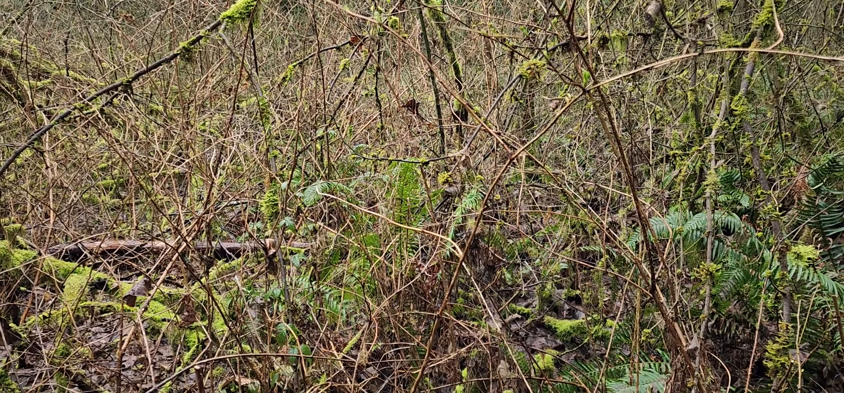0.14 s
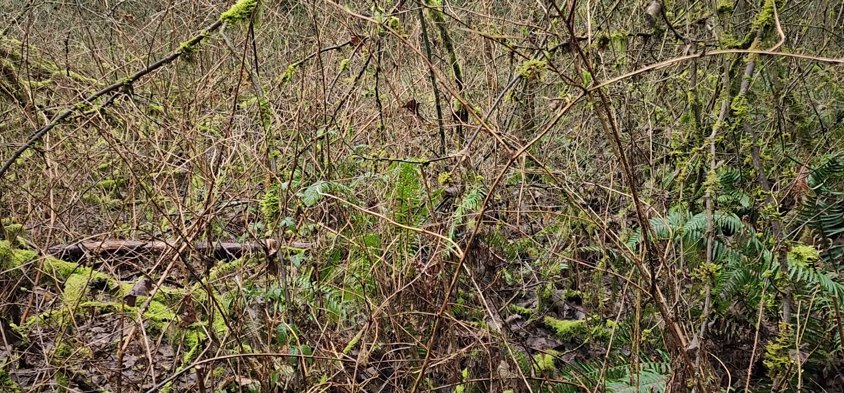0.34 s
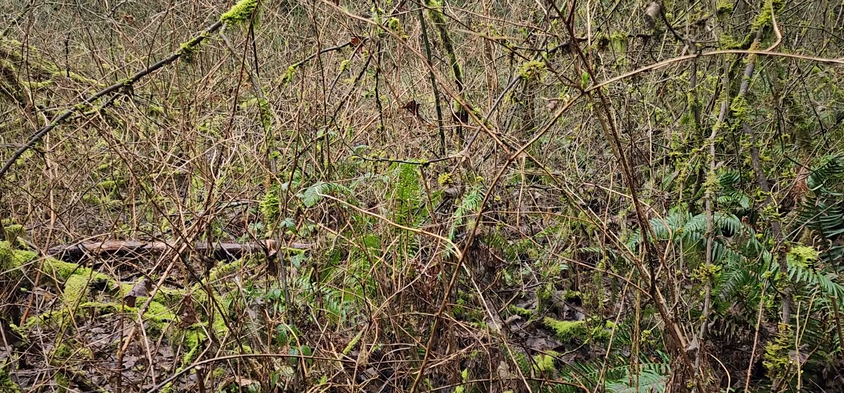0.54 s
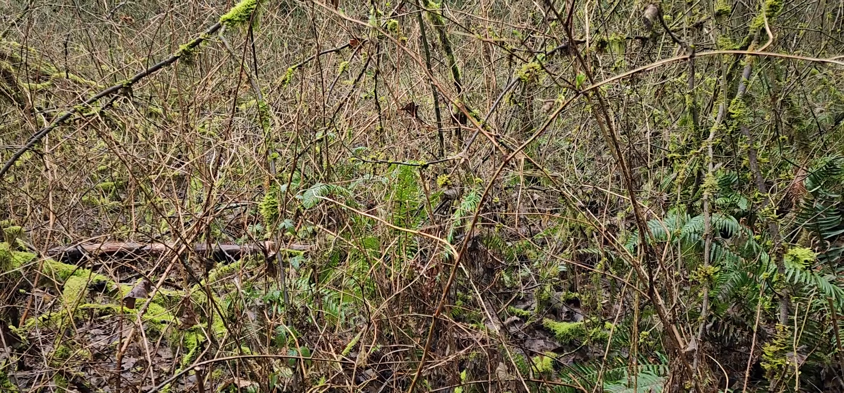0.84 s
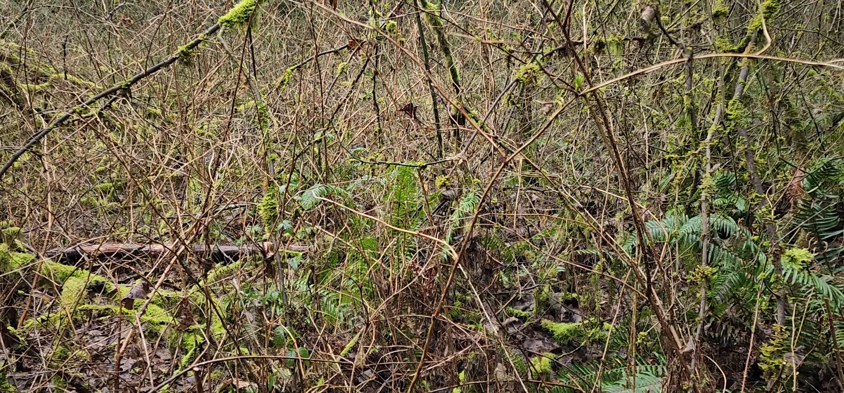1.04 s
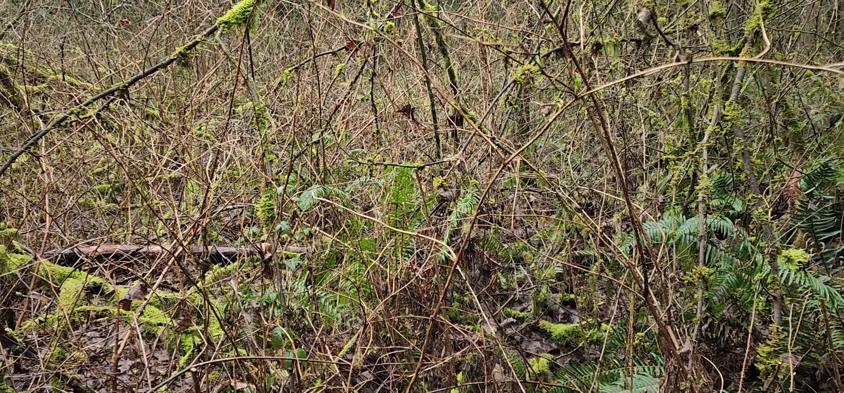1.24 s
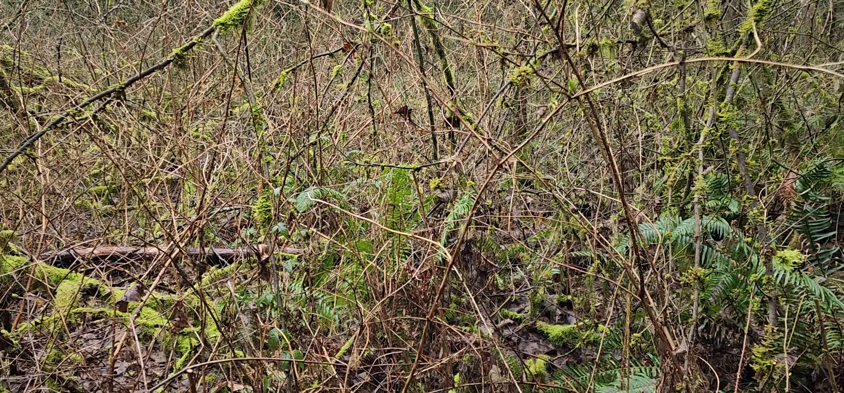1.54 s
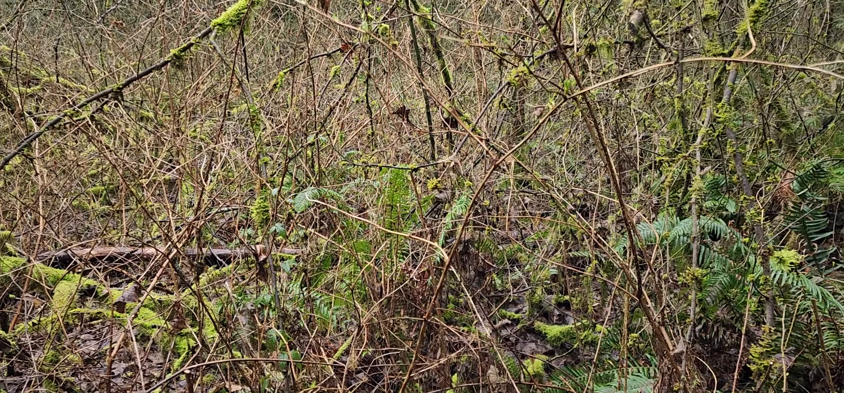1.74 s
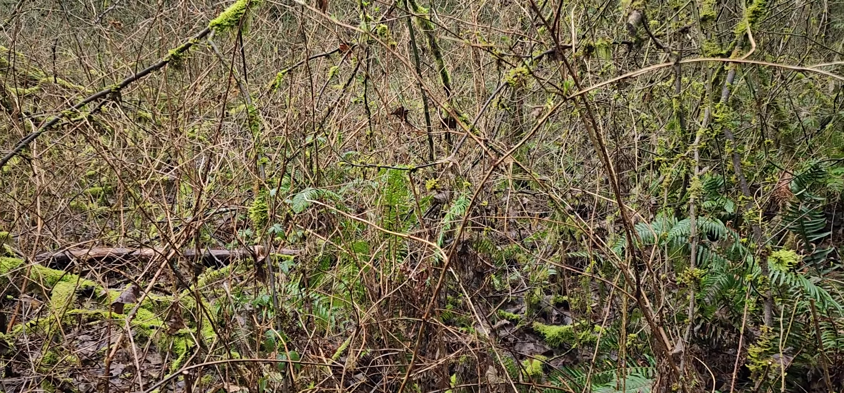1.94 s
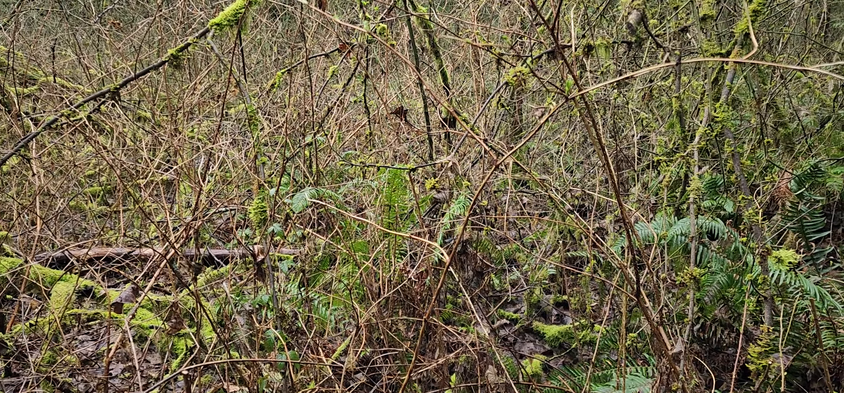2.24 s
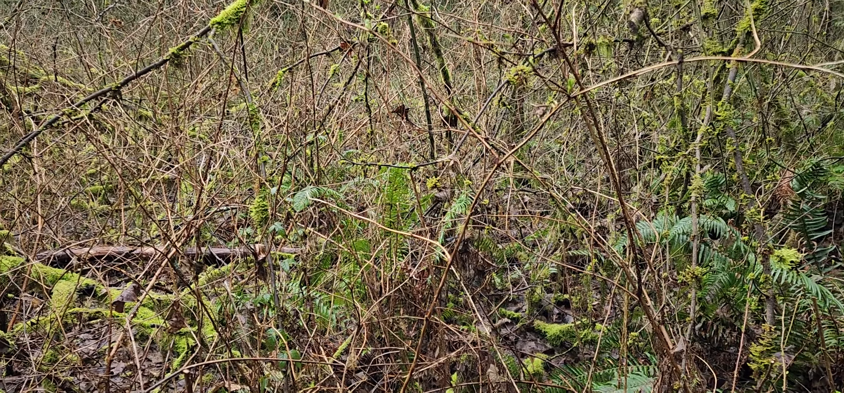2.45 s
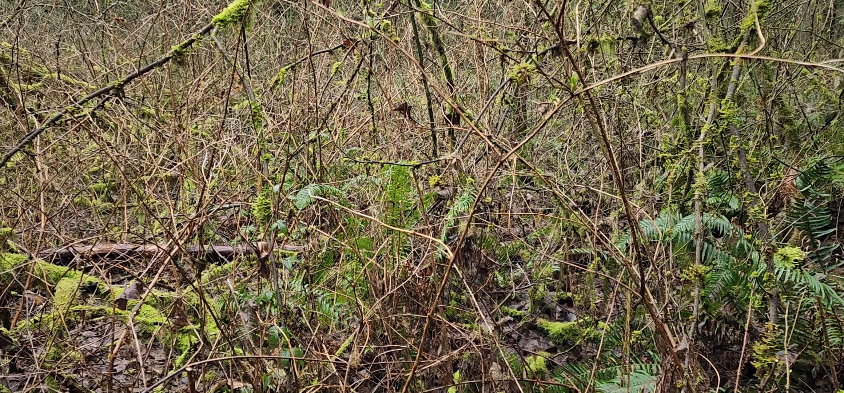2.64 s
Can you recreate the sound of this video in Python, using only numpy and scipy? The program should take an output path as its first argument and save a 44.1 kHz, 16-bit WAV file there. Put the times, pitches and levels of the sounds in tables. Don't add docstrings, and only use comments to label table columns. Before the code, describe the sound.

Two small frogs rasp in a wet thicket. A faint high bird whistle falls at 0.0-0.2 s; light drips tick from 0.5. The first frog creaks unevenly from 0.83 to 1.5, rising and thinning, with faint bird chirps near 0.85 and a dull low drop at 0.97. Then only soft traffic rumble and hiss. At 2.23-2.7 the second frog rasps evenly, rising, ending squeaky with drips.

```python
import sys
import numpy as np
from scipy import signal
from scipy.fft import rfft, irfft, next_fast_len
from scipy.io import wavfile
from scipy.ndimage import uniform_filter1d

SR = 44100
rng = np.random.default_rng(int(sys.argv[2]) if len(sys.argv) > 2 else 0)


def generate_wav(sig):
    pcm = np.round(np.clip(np.atleast_2d(sig).T, -1, 1) * 32767).astype(np.int16)
    wavfile.write(sys.argv[1], SR, pcm)


def how_loud(loudness_db):
    steps = np.asarray(loudness_db, float) / 20
    return 10 ** steps


N = 123921


def along(table, hz):
    table_hz, value = np.array(table, float).T
    return np.interp(np.log(hz + 1), np.log(table_hz + 1), value)


def walk(rate_per_s):
    hold = int(SR / rate_per_s)
    steps = np.repeat(rng.standard_normal(N // hold + 1), hold)
    return 1.3 * uniform_filter1d(uniform_filter1d(steps, hold), hold)[:N]


def pan(left_minus_right_db):
    return how_loud(np.array([[left_minus_right_db], [-left_minus_right_db]]) / 2)


def add(out, start_s, sound):
    i = int(start_s * SR)
    out[..., i:i + sound.shape[-1]] += sound[..., :N - i]


def swell(rise_s, fall_s, hold_s=0):
    t = np.arange(4096) / SR
    after = np.maximum(t - rise_s - hold_s, 0)
    rise = np.sin(np.pi / 2 * np.minimum(t / rise_s, 1)) ** 2
    return t, rise * np.exp(-after ** 2 / (fall_s * (after + fall_s)))


def noise_band(noise, hz, width_hz):
    f = np.arange(2049) * SR / 4096
    return irfft(rfft(noise) * np.exp(-((f - hz) / width_hz) ** 2))


def grainy(hz, width_hz):
    x = noise_band(rng.standard_normal(4096), hz, width_hz)
    return x / np.std(x) / np.sqrt(2)


ECHO_T60_S, ECHO_GAP_S, ECHO_TAPS_DB = .38, .0032, 4


def thicket(x, wet_db):
    t = np.arange(SR // 2) / SR
    taps_db = ECHO_TAPS_DB * rng.exponential(size=(2, len(t)))
    h = rng.standard_normal((2, len(t))) * how_loud(taps_db - 60 * t / ECHO_T60_S)
    h = h * np.clip(t / ECHO_GAP_S - 1, 0, 1)
    h = h / np.sqrt(np.sum(h ** 2, axis=1, keepdims=True))
    return how_loud(wet_db) * signal.fftconvolve(x[None], h, axes=1)[:, :N]


# hz, density_db (dB per Hz)
RUMBLE = [(12, -32.5), (20, -9.5), (65, -4.5), (91, -0.5), (113, -4.5), (134, -10.5), (206, -9.5),
          (264, -12), (400, -19), (520, -57.5), (880, -120)]
HISS = [(240, -37.5), (400, -6.5), (554, -3), (687, -2.5), (835, -4.5), (1140, -11), (1490, -14),
        (1860, -17.5), (3710, -37.5), (4820, -74), (8160, -120)]
AIR = [(3600, 2), (4000, 1), (4750, -4.5), (5700, 3.5), (6800, -7.5), (7500, -2), (8600, -6.5), (9500, -33)]
TOP = [(8500, -23), (10000, -11), (11500, 0), (13000, -3), (15800, 4), (17000, -30)]
RUMBLE_DB, HISS_DB, AIR_DB, TOP_DB = -45, -51.5, -75, -99
# hz, correlation (-)
LIKENESS = [(30, 10), (60, 1), (150, 1.18), (330, .58), (590, 0.29), (1040, -0.7), (1840, 0.08),
            (3260, -0.02), (9000, -0.08)]
# hz, left_minus_right_db
LEAN = [(30, 1.2), (130, .4), (300, 1.1), (2000, 1.3), (4500, 4.4), (9000, 6.5), (13000, 8)]
# time_s, level_db
TRAFFIC = [(0, 1.5), (.4, 1), (0.799, -1), (1.2, 1), (1.5, 2.5), (1.9, -0.5), (2.301, -1), (2.8, -3.5)]
SWELL_TOP_HZ = 200
FLICKER_DB, AIR_FLICKER_DB, FLICKER_PER_S = 1.2, 1.7, 6


def background():
    size = next_fast_len(N)
    f = np.arange(size // 2 + 1) * SR / size
    power = 0
    for table, db in ((RUMBLE, RUMBLE_DB), (HISS, HISS_DB), (AIR, AIR_DB), (TOP, TOP_DB)):
        p = how_loud(along(table, f)) ** 2 * (f > 8)
        power = power + p / p.sum() * how_loud(db) ** 2

    likeness = np.clip(along(LIKENESS, f), -.98, .98)
    mid, side = rfft(rng.standard_normal((2, size))) * np.sqrt(power * size / 2)
    side = side * np.sqrt((1 - likeness) / (1 + likeness))
    both = np.array([mid + side, mid - side]) * pan(1) ** along(LEAN, f)

    traffic_db = np.interp(np.arange(N) / SR, *np.array(TRAFFIC).T)
    half_octave = 2 * np.log2(np.clip(f, 30, 15360) / 30)
    out = 0
    for k in range(19):
        band_hz = 30 * 2 ** (k / 2)
        band = irfft(both * np.clip(1 - np.abs(half_octave - k), 0, 1), size)[:, :N]
        swell_db = traffic_db / (1 + (band_hz / SWELL_TOP_HZ) ** 2)
        flicker_db = FLICKER_DB if k < 14 else AIR_FLICKER_DB
        out = out + band * how_loud(swell_db + flicker_db * walk(FLICKER_PER_S))
    return out


# start_s, length_s, from_hz, to_hz, level_db
BIRD = [
    (.03, .17, 7650, 7400, -78),
    (.828, .022, 7200, 7300, -79),
    (.845, .022, 7250, 7350, -80),
    (.868, .02, 7250, 7350, -84),
]


def bird():
    out = np.zeros(N)
    for start_s, length_s, from_hz, to_hz, db in BIRD:
        u = np.arange(int(length_s * SR)) / (length_s * SR)
        hz = from_hz + (to_hz - from_hz) * u + 60 * walk(150)[:len(u)]
        level = how_loud(db + 4 * walk(60)[:len(u)]) * np.sin(np.pi * u ** .5)
        add(out, start_s, level * np.sin(2 * np.pi * np.cumsum(hz) / SR))
    return out * pan(4) + thicket(out, -4)


# time_s, peak_db, centre_hz, left_minus_right_db
TICKS = [(.0533, -67, 12500, 12), (.5277, -77, 12000, 4), (.5866, -73, 12000, 8), (.6779, -63, 11900, 3),
         (.7487, -64, 12500, 7), (.7662, -66, 12500, 6), (.7776, -61, 12000, 5), (1.061, -68, 11500, 4),
         (1.2042, -62, 10500, 2), (2.604, -61, 12000, 8), (2.6893, -67, 12000, 8)]
TICK_WIDTH_HZ, TICK_FALL_S, TICK_TAIL_DB = 4000, .001, -21
# time_s, peak_db, centre_hz, left_minus_right_db
DROPS = [(.520, -73, 5300, 35), (0.522, -53.5, 3300, -3), (.587, -58.5, 7800, 6), (0.643, -65, 6000, -23),
         (.970, -41, 550, -17.5), (1.203, -48, 5500, 9), (1.21, -59, 8100, 2), (1.216, -62, 9200, 1),
         (1.212, -51, 3500, -2), (2.477, -64.5, 8100, 2), (2.604, -55.5, 5100, 19),
         (2.605, -58.5, 8300, 13), (2.69, -63, 8500, 10), (2.689, -58, 5950, -15)]
DROP_Q, DROP_FALL_S, DROP_TAIL_DB = 4.2, .0012, -26
TAIL_FALL_S = .025


def drops():
    out, t = np.zeros((2, N)), np.arange(4096) / SR
    rows = [row + (TICK_WIDTH_HZ, TICK_FALL_S, TICK_TAIL_DB) for row in TICKS]
    for row in DROPS:
        hz = row[2]
        rows.append(row + (hz / DROP_Q, max(DROP_FALL_S, 3 / hz), DROP_TAIL_DB))
    for time_s, db, hz, pan_db, width_hz, fall_s, tail_db in rows:
        env = np.exp(-t / fall_s) + how_loud(tail_db) * np.exp(-t / TAIL_FALL_S)
        left, right, shared = rng.standard_normal((3, 4096))
        noise = np.array([left + shared, right + shared]) * env
        burst = noise_band(np.roll(noise, 512, axis=1), hz, width_hz)
        burst = burst / np.max(np.abs(burst), axis=1, keepdims=True)
        add(out, time_s - 512 / SR, burst * how_loud(db) * pan(pan_db))
    return out


# start_s, pulses (count), period_s
RUNS_B = [
    (2.2313, 2, .0169),
    (2.2647, 18, .01848),
    (2.5974, 7, .01947),
]
# time_s, pitch_hz, peak_db, half_pitch_db, squeak_db
EFFORT_B = [
    (2.23, 2050, -54, -6, -9),
    (2.249, 2100, -46, -8, -14),
    (2.266, 2420, -43, 0, -20),
    (2.34, 2550, -41, -1, -24),
    (2.43, 2700, -41, 0, -24),
    (2.5, 2740, -43, 1, -22),
    (2.617, 2820, -45, 1, -14),
    (2.636, 2800, -50, 2, 6),
    (2.715, 2800, -56, 0, 3),
]
# pitch_multiple (-), level_db
SAC_B = [(.75, -9), (1.26, -9)]
SCATTER_DB, PITCH_JITTER = .8, .007
SQUEAK_HZ, RASP_HZ, RASP_WIDTH_HZ, RASP_DB = 3050, 2200, 900, -14
LEAD_B_RAD, PAN_B_DB, WET_B_DB = 1.1, 1.5, -5


def frog_b():
    dry = np.zeros(N)
    effort_s, *efforts = np.array(EFFORT_B, float).T
    t, env = swell(rise_s=.0012, fall_s=.0014, hold_s=.001)
    low_env = swell(rise_s=.0022, fall_s=.0022)[1]
    times_s = np.concatenate([start_s + period_s * np.arange(n) for start_s, n, period_s in RUNS_B])
    for s, chance in zip(times_s, rng.standard_normal((len(times_s), 5))):
        hz, db, low_db, squeak_db = (np.interp(s, effort_s, e) for e in efforts)
        phase = 2 * np.pi * hz * (1 + PITCH_JITTER * chance[0]) * t
        tone = np.sin(phase)
        for k, (multiple, partial_db) in enumerate(SAC_B):
            tone = tone + how_loud(partial_db + 2 * SCATTER_DB * chance[2 + k]) * np.sin(multiple * phase)
        tone = tone + how_loud(squeak_db) * np.sin(2 * np.pi * SQUEAK_HZ * t + chance[4])
        tone = tone + how_loud(RASP_DB) * grainy(RASP_HZ, RASP_WIDTH_HZ)
        low = how_loud(low_db) * low_env * np.sin(phase / 2)
        add(dry, s, how_loud(db + SCATTER_DB * chance[1]) * (env * tone + low))
    left = np.real(signal.hilbert(dry, next_fast_len(N))[:N] * np.exp(1j * LEAD_B_RAD))
    return np.array([left, dry]) * pan(PAN_B_DB) + thicket(dry, WET_B_DB)


# start_s, peak_db, pitch_hz
FROG_A = [(0.8285, -54, 2550), (0.848, -46, 2500), (0.8704, -42.5, 2500), (0.8905, -42.5, 2660),
          (0.9535, -40.5, 2667), (0.9722, -44.5, 2846), (0.9929, -43, 2740), (1.0146, -41, 2790),
          (1.0348, -48, 2905), (1.054, -42.5, 2715), (1.0783, -40.5, 3015), (1.0971, -44, 2994),
          (1.1132, -41.5, 2917), (1.1371, -41, 3082), (1.1773, -51, 2914), (1.296, -43.5, 2967),
          (1.3379, -44, 3054), (1.4168, -47, 3105), (1.4551, -49.5, 3132)]
# pitch_multiple (-), level_db
VOICE_A = [(.5, -8), (1, 0), (1.17, -9), (1.38, -23)]
PARTIAL_SCATTER_DB, PARTIAL_JITTER = 2, .023
HUM_HZ, HUM_RISE_HZ_PER_S, HUM_WIDTH_HZ = 2510, 850, 55
HUM_DB, HUM_FADE_DB_PER_S = -11, -22
WET_A_DB = -4


def frog_a():
    dry, hum = np.zeros(N), np.zeros(N)
    t, env = swell(rise_s=.0012, fall_s=.0014, hold_s=.001)
    hum_env = swell(rise_s=.0085, fall_s=.022)[1]
    for (s, db, hz), chance in zip(FROG_A, rng.standard_normal((len(FROG_A), 8))):
        tone = 0
        for k, (multiple, partial_db) in enumerate(VOICE_A):
            loose = multiple != 1
            gain = how_loud(partial_db + PARTIAL_SCATTER_DB * chance[k] * loose)
            partial_hz = multiple * hz * (1 + PARTIAL_JITTER * chance[4 + k] * loose)
            tone = tone + gain * np.sin(2 * np.pi * partial_hz * t + chance[4 + k])
        add(dry, s, how_loud(db) * env * tone)
        since_s = s - FROG_A[0][0]
        sac = hum_env * grainy(HUM_HZ + HUM_RISE_HZ_PER_S * since_s, HUM_WIDTH_HZ)
        add(hum, s, how_loud(db + HUM_DB + HUM_FADE_DB_PER_S * since_s) * sac)
    return dry + hum + thicket(dry + hum, WET_A_DB)


def scene():
    return background() + bird() + drops() + frog_b() + frog_a()


def low_pass(x):
    return signal.sosfilt(signal.butter(12, 15830, fs=SR, output="sos"), x)


def record(dry):
    return low_pass(dry)


dry = scene()
out = record(dry)
generate_wav(out)
```